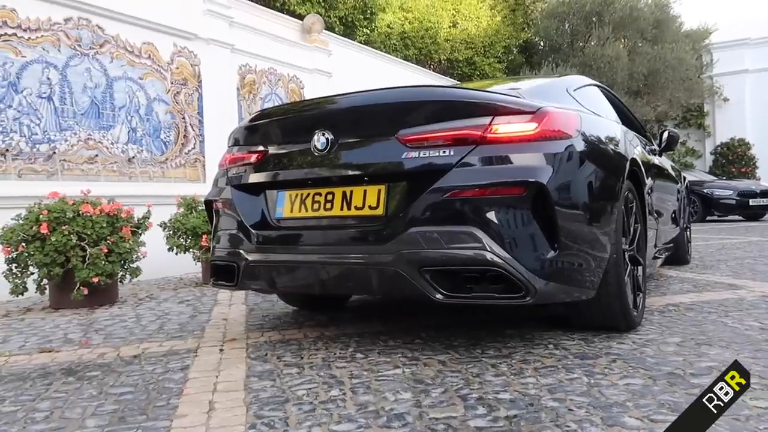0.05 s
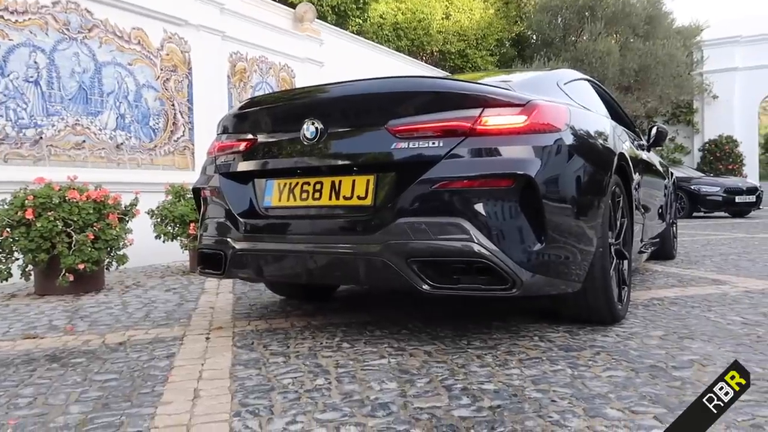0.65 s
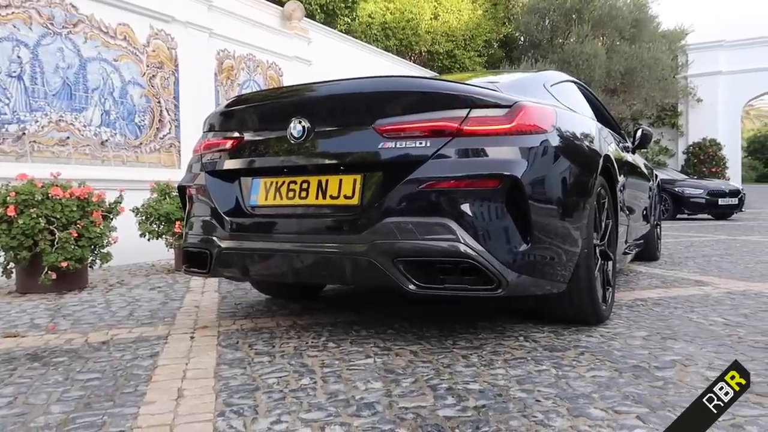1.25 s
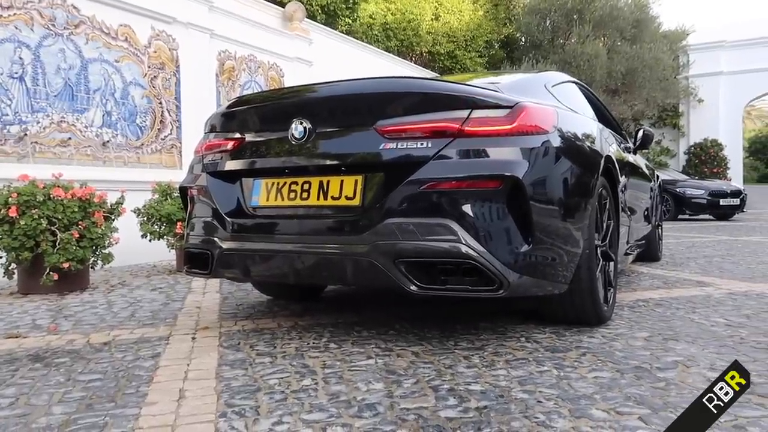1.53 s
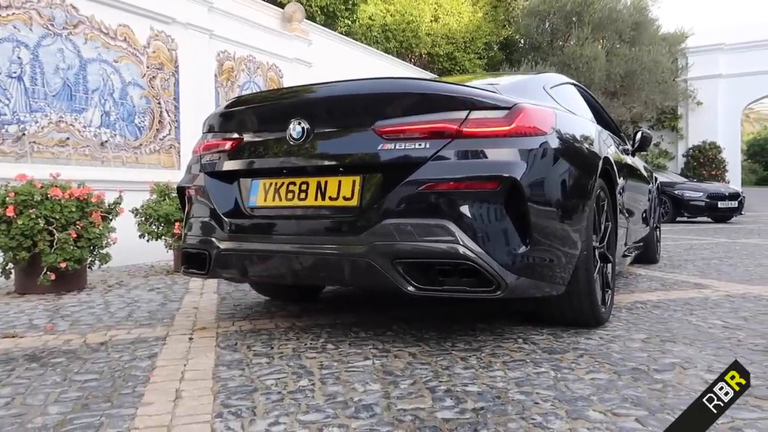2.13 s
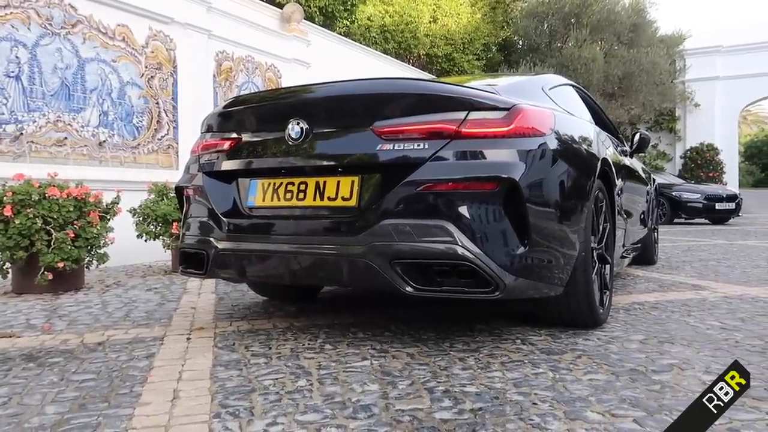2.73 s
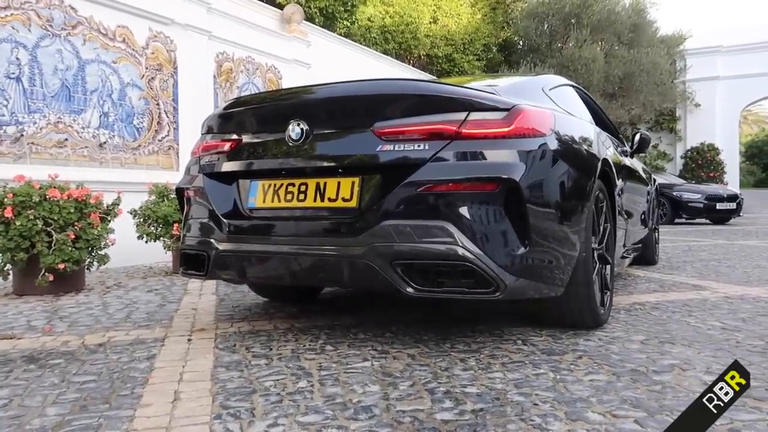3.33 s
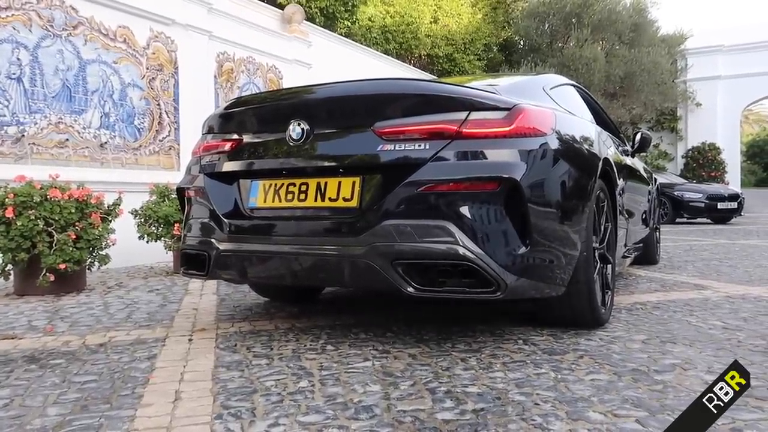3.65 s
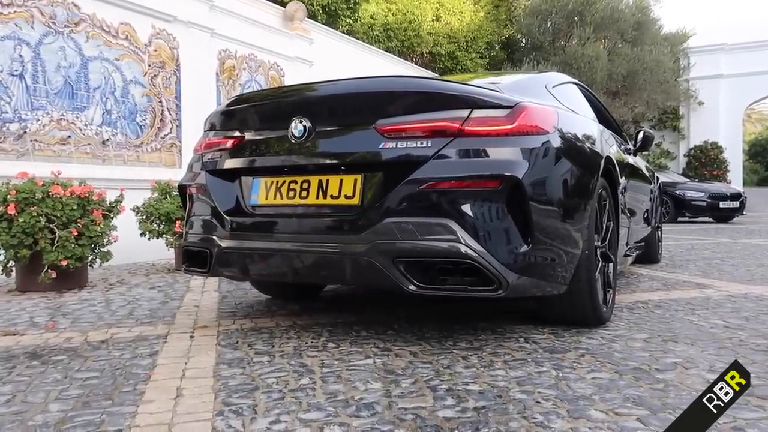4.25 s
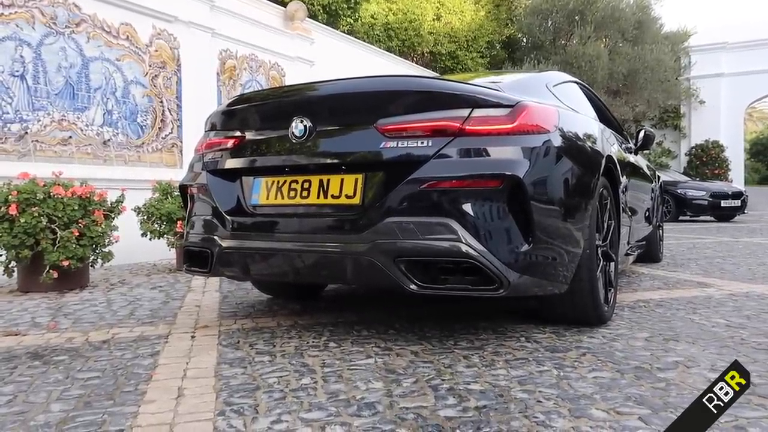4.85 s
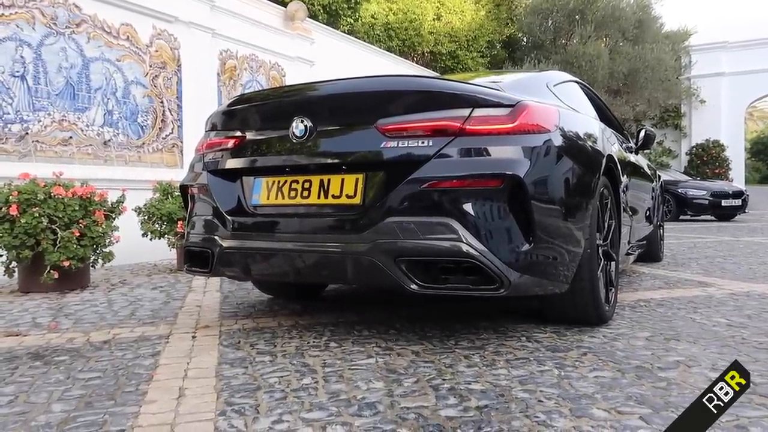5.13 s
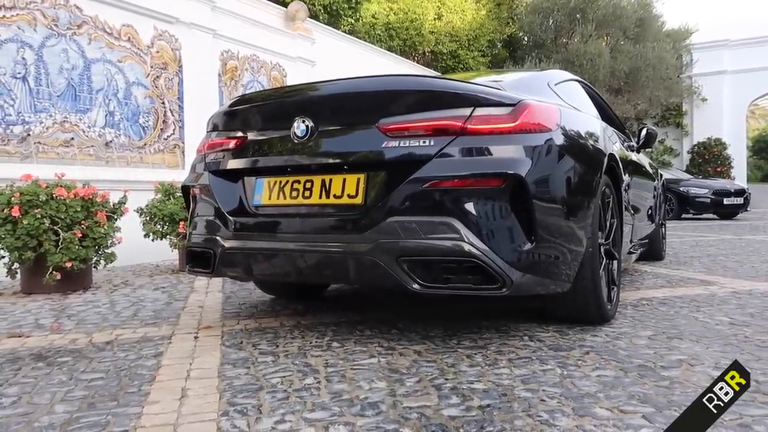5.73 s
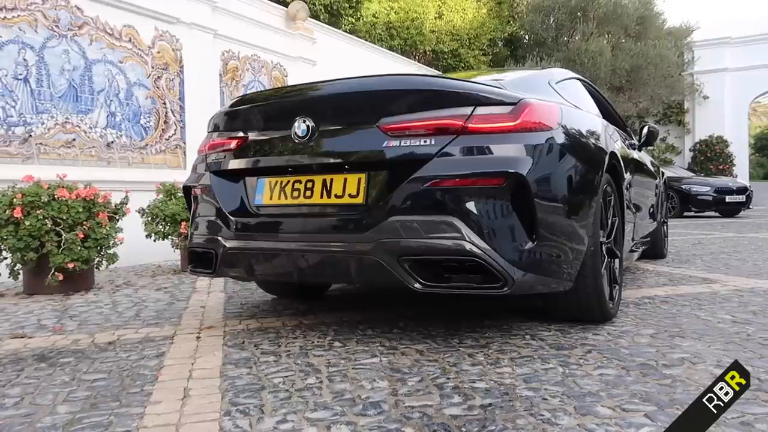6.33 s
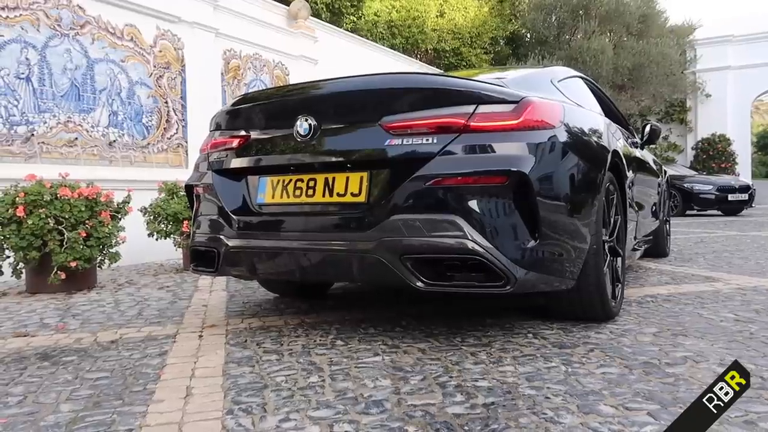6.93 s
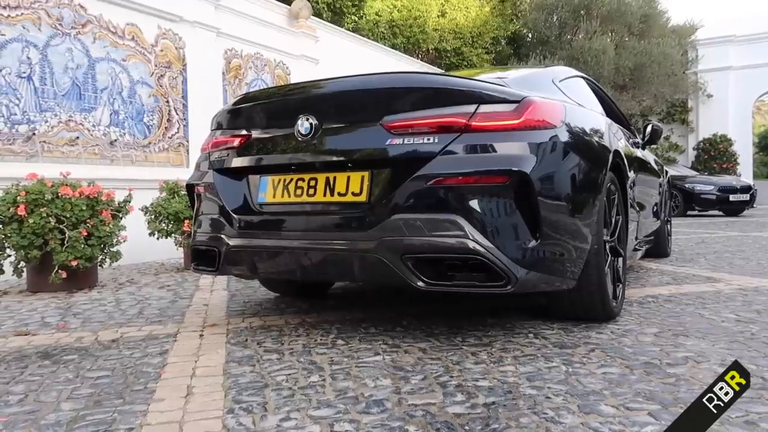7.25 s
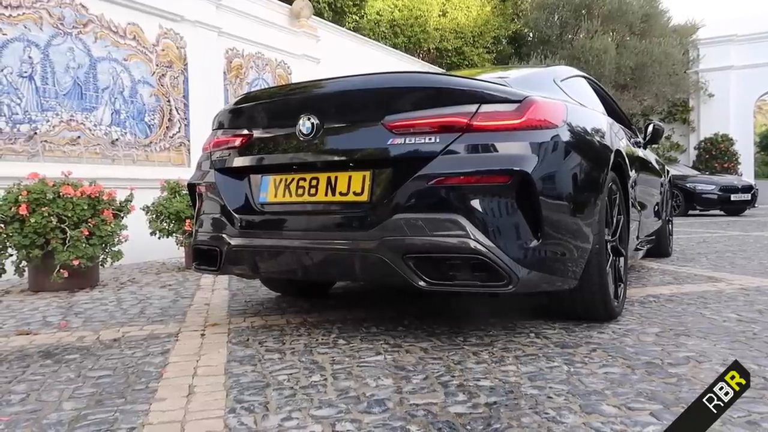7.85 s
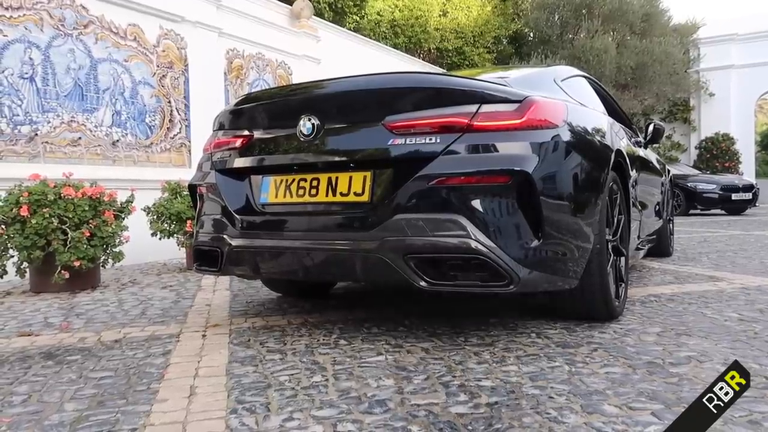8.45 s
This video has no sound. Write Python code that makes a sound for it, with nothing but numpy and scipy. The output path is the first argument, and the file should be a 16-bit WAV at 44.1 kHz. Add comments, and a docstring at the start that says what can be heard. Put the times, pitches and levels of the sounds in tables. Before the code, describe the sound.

A V8 petrol car starts with a flare, idles briefly, then revs in bursts, its exhaust popping and burbling in between.

```python
"""A walled courtyard, a few metres behind the tailpipes of a V8 petrol car.
Each press of the throttle swings the engine's speed up, and drag brings it back towards idle.
Two banks of cylinders fire unevenly and boom through the exhaust, and gas rasps with each firing.
With the throttle shut, unburnt fuel pops and burbles. The steel silencer knocks now and then,
the walls add a short echo, and a soft hiss lies behind it all."""
import sys
import numpy as np
from scipy import signal
from scipy.fft import rfft, irfft, next_fast_len
from scipy.io import wavfile
from scipy.ndimage import uniform_filter1d

SR = 44100
rng = np.random.default_rng(int(sys.argv[2]) if len(sys.argv) > 2 else 0)


def unload_audio(sound):
    """Save the sound as a 16-bit wav file, at the path given as the first command line argument."""
    columns = np.transpose(np.atleast_2d(sound))
    # keep every value between -1 and 1, then stretch to whole-number steps
    steps = np.round(np.clip(columns, -1, 1) * 32767)
    wavfile.write(sys.argv[1], SR, steps.astype(np.int16))


N = 374409
TIME = np.arange(N) / SR
FFT_SIZE = next_fast_len(N + SR, real=True)
FREQS = np.maximum(np.fft.rfftfreq(FFT_SIZE, 1 / SR), 1)


def undb(db):
    """Turn decibels into a number to multiply by."""
    return 10 ** (np.asarray(db) / 20)


def read_table(table, at):
    """Look up `at` in a table's first column and read the others, with straight lines between rows."""
    keys, *columns = np.transpose(table)
    return np.array([np.interp(at, keys, column) for column in columns])


def response(colour, resonances=()):
    """Build a filter from a tone colour (Hz, dB) and resonances (Hz, width in Hz, dB)."""
    hz, db = np.transpose(colour)
    gain_db = np.interp(np.log(FREQS), np.log(hz), db)
    for centre, width, height in resonances:
        gain_db = gain_db + height * .5 ** ((2 * (FREQS - centre) / width) ** 2)
    # make the filter ring only after a blow, never before it
    cepstrum = irfft(gain_db * np.log(10) / 20, FFT_SIZE)
    cepstrum[1:FFT_SIZE // 2] *= 2
    cepstrum[FFT_SIZE // 2 + 1:] = 0
    return np.exp(rfft(cepstrum))


def through(x, gain):
    """Pass a sound through a filter, given as one gain for each frequency."""
    return irfft(rfft(x, FFT_SIZE) * gain, FFT_SIZE)[..., :N]


def band(x, lo_hz, hi_hz, order=3):
    """Keep the sound between two frequencies."""
    return signal.sosfilt(signal.butter(order, [lo_hz, hi_hz], "band", fs=SR, output="sos"), x)


def noise(colour, resonances=()):
    """Noise with a given tone colour and an average (rms) level of 1."""
    x = through(rng.standard_normal(N), response(colour, resonances))
    return x / np.std(x)


def smooth(x, span_s):
    """Blur a signal by taking a sliding average twice."""
    size = int(span_s * SR)
    return uniform_filter1d(uniform_filter1d(x, size), size)


def steady(x, span_s):
    """Hold the average level near 1, keeping throbs that are faster than the span."""
    return x / np.sqrt(np.abs(smooth(x ** 2, span_s)) + 1e-18)


def wander(count):
    """Random values joined by straight lines over the whole scene."""
    return np.interp(TIME, np.linspace(0, TIME[-1], count), rng.standard_normal(count))


def envelope(start_s, hold_s, attack_s, release_s):
    """Rise in a straight line, hold until hold_s after the start, then die away."""
    age = TIME - start_s
    return np.clip(age / attack_s, 0, 1) * np.exp(-np.maximum(age - hold_s, 0) / release_s)


def impulses(times, sizes):
    """Sharp kicks at the given times, each shared between two neighbouring samples."""
    place = np.clip(times * SR, 0, N - 2)
    i = place.astype(int)
    return np.bincount(i, sizes * (1 - place + i), N) + np.bincount(i + 1, sizes * (place - i), N)


def die_away(kicks, decay_s):
    """Give each kick a fading tail."""
    return signal.lfilter([1], [1, -np.exp(-1 / (decay_s * SR))], kicks)


def puffs(kicks, decay_s):
    """A dying burst of noise after each kick, like swirling gas."""
    return die_away(kicks, decay_s) * rng.standard_normal(N)


# How loud the background hiss is. Each row: time in seconds, level in dB.
HISS_LEVELS = [(0, -26), (.1, -45.5), (.25, -46.5), (1.2, -45.5), (2.24, -39.5), (2.26, -33), (2.3, -38),
               (2.55, -36), (2.8, -47.5), (4.3, -42.5), (4.45, -46.5), (7.55, -47), (7.68, -40.5),
               (7.78, -47.5), (8.49, -53)]
# Its tone colour in the centre and at the sides. Each row: frequency in Hz, level in dB.
HISS_CENTRE_COLOUR = [(30, 2), (200, -0.5), (450, 2.5), (620, -0.5), (760, 1.5), (1000, -3.5), (2000, -7.5),
                      (3000, -13.5), (4000, -17), (6000, -27), (9000, -33), (13000, -55)]
HISS_SIDES_COLOUR = [(100, -49.5), (200, -19.5), (300, 2), (1000, 4), (3000, 3.5), (4000, 0), (6000, -4),
                     (9000, -6), (13000, -12.5)]


def hiss(sides_db=-13.5, flutter_db=1.85):
    """A soft hiss that swells now and then: the lows flutter in the centre, the treble is wide."""
    level_db, = read_table(HISS_LEVELS, TIME)
    flutter = undb(flutter_db * wander(count=120))
    centre = noise(HISS_CENTRE_COLOUR) * flutter
    sides = noise(HISS_SIDES_COLOUR) * undb(sides_db)
    return undb(level_db) * np.array([centre + sides, centre - sides])


def courtyard(x, centre_db=-16, sides_db=-17, gap_s=.014, echo_s=.23):
    """Walls and cobbles return a short, blurred echo; its upper part differs between the ears."""
    t = TIME[:SR]
    tails = rng.standard_normal((2, SR)) * undb(-60 * t / echo_s) * (t > gap_s)
    tails /= np.sqrt(np.sum(tails ** 2, axis=1, keepdims=True))
    centre, sides = through(x, rfft(tails, FFT_SIZE))
    centre_colour = [(100, -9), (500, 11), (3000, 3.5), (10000, -1.5)]
    sides_colour = [(130, -27), (300, -10), (700, -3), (2000, 2.5), (6000, -4)]
    centre = undb(centre_db) * through(centre, response(centre_colour))
    sides = undb(sides_db) * through(sides, response(sides_colour))
    return np.array([centre + sides, centre - sides])


def whine(level_db=-43, decay_s=.062):
    """A thin metallic whine dies away at the very start, as the engine catches."""
    colour = [(1000, -52.5), (3500, -10.5), (6500, -24), (13000, -31.5)]
    ring = noise(colour, resonances=[(4900, 530, 8.9), (6400, 330, 3.9)])
    return ring * undb(level_db) * np.exp(-TIME / decay_s)


# Light ticks of metal. Each row: start in seconds, level in dB.
METAL_TICKS = [(2.592, -48.5), (4.585, -58), (7.992, -52.5), (8.068, -51.5)]


def ticks(soften_s=.003):
    """Metal ticks faintly: tiny bursts of high noise with softened edges."""
    times, level_db = np.transpose(METAL_TICKS)
    kicks = uniform_filter1d(impulses(times, undb(level_db)), int(soften_s * SR))
    return band(puffs(kicks, decay_s=.01), 5500, 11000, order=4)


# Hollow knocks in the silencer. Each row: start in seconds, level in dB, ringing pitch in Hz.
SILENCER_KNOCKS = [(.184, -39, 1800), (.926, -45, 1800), (2.263, -30.5, 2270), (2.923, -25, 1650),
                   (2.936, -29, 1750), (3.173, -27, 1670), (3.303, -29.5, 1550), (3.351, -27, 1630),
                   (3.503, -37, 2100), (3.564, -27, 1800), (4.2924, -18, 1930), (4.3018, -15, 1590),
                   (4.308, -33, 2880), (4.308, -26, 1550), (5.121, -28.5, 1516), (5.159, -33.5, 1600),
                   (5.202, -33.5, 1670), (5.56, -37, 1823), (5.571, -26, 1680), (5.939, -27, 1610),
                   (6.17, -31.5, 1890), (6.65, -35, 1500), (6.887, -35, 1680), (6.908, -41, 2000),
                   (7.602, -33, 1511), (7.707, -33.5, 1600), (7.991, -36.5, 1690), (8.062, -30.5, 1991),
                   (8.169, -33, 1800), (8.231, -28.5, 1800)]


def knocks(decay_s=.004, spread=.12):
    """Small bursts inside the silencer ring its steel shell briefly."""
    out = np.zeros(N)
    for start_s, level_db, hz in SILENCER_KNOCKS:
        burst = puffs(impulses(np.array([start_s]), np.ones(1)), decay_s)
        ring = band(burst, hz * (1 - spread), hz * (1 + spread), order=2)
        out += undb(level_db) * ring * np.sqrt(decay_s * SR / 2 / np.sum(ring ** 2))
    return out


# The tone colour of the exhaust. Each row: frequency in Hz, level in dB.
PIPE_COLOUR = [(15, -48.5), (33, -11.5), (60, -18), (90, -2.5), (130, 4), (165, 0), (210, -13.5),
               (400, -20), (550, -41.5), (1200, -43.5), (2000, -60), (3000, -62), (6000, -89), (9500, -90),
               (14000, -99)]
# Its resonances and dips. Each row: frequency in Hz, width in Hz, boost or cut in dB.
PIPE_RESONANCES = [(185, 86, 1.5), (182.9, 15, -2), (252.3, 51, 3.5), (304.3, 25, -4), (364, 30, 1.5),
                   (474.6, 30, 8), (595, 32, 8.5), (742, 86, 9.5), (1014, 35, 2.5), (1130, 17, 6.5),
                   (1560, 200, 5), (1733, 150, 9.5), (2167, 340, 11)]


def exhaust_pipe():
    """The exhaust acts as a filter: it lets the lows out and rings at its own pitches."""
    return response(PIPE_COLOUR, PIPE_RESONANCES)


# The tone colour of a shock wave. Each row: frequency in Hz, level in dB.
SHOCK_COLOUR = [(100, -17.5), (220, -7), (350, 7), (480, 5), (560, -10.5), (800, -11), (1100, -11),
                (1500, -22.5), (2300, -27), (3800, -37), (6000, -54.5), (14000, -85.5)]


def shocks(times, bark_db, peak_db=-5, full_at_db=-10, db_per_db=1.86):
    """A hard pop steepens into a shock wave that strikes the pipe's resonances: a chesty bang."""
    ring = response(SHOCK_COLOUR, PIPE_RESONANCES)
    sizes = undb(peak_db + db_per_db * np.minimum(bark_db - full_at_db, 0))
    return -through(impulses(times, sizes), ring) / np.abs(irfft(ring)).max()


# Loud pops, from fuel catching fire in the exhaust or a cylinder firing hard.
# Each row: start in seconds, then the levels of the thump, the bark and the crack in dB.
FUEL_POPS = [(.059, -2, -18, -36.5), (.12, -4, -17.5, -22.5), (0.509, -10, -35, -36),
             (0.641, -10.5, -35, -26.5), (0.719, -11.5, -32.5, -47.5), (0.788, -2.5, -21.5, -35.5),
             (0.85, -5, -23, -34.5), (0.884, -8, -30.5, -27), (1.05, -10, -36, -34), (1.077, -7, -27, -44),
             (1.149, -4, -22.5, -27.5), (1.208, -15.5, -25.5, -57), (1.24, -17, -41, -50),
             (1.311, -20, -37.5, -50), (1.866, -25, -42.5, -50), (2.071, -22.5, -42, -36),
             (2.462, -22.5, -27.5, -42), (2.517, -18, -41.5, -40.5), (2.536, -15.5, -27.5, -45),
             (2.561, -9, -31.5, -33.5), (2.578, -11, -25.5, -41), (2.592, -16.5, -20.5, -33.5),
             (2.606, -9.5, -37, -29), (2.821, -8.5, -18, -36), (2.934, -8.5, -17, -23),
             (3.15, -3.5, -26, -29.5), (3.172, -13, -19.5, -23), (3.297, -9, -23, -23),
             (3.349, -4, -26, -24), (3.427, -11.5, -21.5, -27), (3.5019, -6.5, -15.5, -28),
             (3.523, -3, -20.5, -24), (3.534, -6.5, -18.5, -25.5), (3.541, -11, -22, -22),
             (3.5635, -12, -17.5, -14), (3.573, -17, -18.5, -19), (4.2932, -12, -13, -7),
             (4.3014, -6.5, -20, -16.5), (4.3078, -11.5, -17.5, -14), (4.368, -14.5, -20, -28),
             (4.734, -10.5, -23.5, -31.5), (4.864, -15, -24.5, -26), (4.957, -12, -25.5, -30.5),
             (5.084, -5, -31.5, -41), (5.099, -3.5, -29, -51), (5.193, -9.5, -20, -30),
             (5.246, -4, -21.5, -26), (5.266, -3.5, -26.5, -33), (5.907, -12, -21.5, -14.5),
             (5.915, -4, -18.5, -25), (5.933, -10, -18, -34.5), (5.968, -5.5, -25.5, -29),
             (6.162, -9, -22, -23.5), (6.176, -16.5, -24.5, -27), (6.264, -11.5, -26.5, -29.5),
             (6.298, -16.5, -23, -32.5), (6.36, -9.5, -29, -35), (6.379, -5.5, -20.5, -33),
             (6.447, -8, -26, -38), (6.501, -5.5, -19.5, -40), (6.649, -6.5, -27.5, -31.5),
             (6.687, -3.5, -36.5, -41), (6.718, -7, -25, -30), (6.7234, -4, -16, -19.5),
             (6.745, -21.5, -25, -32.5), (6.843, -4.5, -30.5, -41), (6.961, -6, -34, -31.5),
             (6.992, -16.5, -34, -57), (7.566, -15, -28.5, -40), (7.601, -3, -24.5, -28.5),
             (7.991, -6.5, -25.5, -46), (8.036, -11.5, -36.5, -59), (8.062, -11.5, -25, -37),
             (8.167, -4.5, -24, -33)]
# The tone colours of those three parts. Each row: frequency in Hz, level in dB.
THUMP_COLOUR = [(50, -2.5), (90, -6.5), (140, -1), (400, 2), (800, 2), (1400, -6), (3000, -16),
                (9000, -20.5)]
BARK_COLOUR = [(120, -20.5), (270, 5), (420, 4.5), (560, -17.5), (800, -12), (1200, -19.5), (1700, -20.5),
               (2300, -31.5), (2800, -41), (6000, -51.5), (14000, -68)]
CRACK_COLOUR = [(100, -11), (450, 14.5), (850, 5.5), (1300, -0.5), (2200, -16.5), (2900, -17),
                (6000, -41.5), (14000, -59)]


def pops(pipe, spray_db=-17, round_trip_s=.0084, return_db=-12):
    """Each pop thumps the gas in the pipe, barks as the flame runs out, and cracks at the tip."""
    times, thump_db, bark_db, crack_db = np.transpose(FUEL_POPS)
    # a pressure wave runs down the pipe and back, weaker on every trip
    echoes = 1 / (1 - undb(return_db) * np.exp(-2j * np.pi * FREQS * round_trip_s))
    thump = -through(impulses(times, undb(thump_db)), pipe * response(THUMP_COLOUR))
    thump /= np.abs(irfft(pipe)).max()
    flame, tip = response(BARK_COLOUR), response(CRACK_COLOUR)
    bark = through(puffs(impulses(times, undb(bark_db)), decay_s=.008), flame * echoes)
    bark /= np.sqrt(np.mean(np.abs(flame) ** 2))
    kicks = impulses(times, undb(crack_db))
    spray = undb(spray_db) * puffs(kicks, decay_s=.0012)
    crack = through(spray - kicks, tip * echoes) / np.abs(irfft(tip)).max()
    return thump + bark + crack + shocks(times, bark_db)


def misfires(dip_db=-3, lead_s=.0069, half_width_s=.004):
    """Fuel fails to burn just before each pop, so the engine's level dips and the pop stands clear."""
    dip = np.zeros(N)
    for start_s, *_ in FUEL_POPS:
        dip = np.maximum(dip, 1 - np.abs(TIME - start_s + lead_s) / half_width_s)
    return undb(dip_db * dip)


def sputter(cycle_hz, decay_s=.011, depth=1.2):
    """Late fuel burns in soft spurts, about two per engine cycle; gives a gain that hovers near 1."""
    half_cycles = 2 * np.cumsum(cycle_hz) / SR
    k = np.arange(1, int(half_cycles[-1]))
    times = np.interp(k + rng.random(len(k)) / 2, half_cycles, TIME)
    spurts = die_away(impulses(times, np.ones(len(k))), decay_s)
    return steady(1 + depth * smooth(spurts, .003), .11)


# Runs of late-burning fuel. Each row: start and length in seconds, then boom, bark and rasp in dB.
BURBLE_RUNS = [(0, 0.03, -16.5, -22.5, -44), (0.488, 0.25, -26, -39, -54), (0.842, 0.09, -23.5, -30.5, -45),
               (1.185, 0.16, -23.5, -54, -61), (3.143, 0.045, -18.5, -20.5, -34.5),
               (3.297, 0.052, -32.5, -26, -36), (3.413, 0.058, -24, -25, -44),
               (3.525, 0.0069, -16.5, -13.5, -26), (3.552, 0.11, -24, -54, -46),
               (4.191, 0.11, -14.5, -31, -51), (4.462, 0.056, -41.5, -38, -45.5),
               (4.928, 0.17, -32, -32.5, -46.5), (4.568, 0.18, -40, -30, -47.5),
               (4.716, 0.071, -26.5, -23.5, -37.5), (4.856, 0.034, -21, -29, -37),
               (5.084, 0.053, -17.5, -20, -41), (5.199, 0.078, -17.5, -24, -44.5),
               (5.792, 0.13, -17, -35.5, -47.5), (5.898, 0.06, -19.5, -23, -34),
               (5.967, 0.07, -18.5, -26.5, -37.5), (6.067, 0.056, -18, -27, -38),
               (6.14, 0.034, -11, -20, -36), (6.207, 0.19, -15.5, -26, -39.5),
               (6.427, 0.053, -30.5, -31, -41), (6.488, 0.12, -21.5, -33.5, -42.5),
               (6.643, 0.1, -36, -26, -46.5), (6.81, 0.2, -30.5, -31.5, -51),
               (7.997, 0.084, -28, -27.5, -56)]


def burbles(cycle_hz, attack_s=.011, release_s=.025):
    """The power that late-burning fuel adds to the engine's boom, bark and rasp."""
    power = np.zeros((3, N))
    for start_s, length_s, *levels_db in BURBLE_RUNS:
        power += np.outer(undb(levels_db), envelope(start_s, length_s, attack_s, release_s)) ** 2
    power[1:] *= sputter(cycle_hz) ** 2  # only the bark and rasp sputter
    return power


# Presses of the throttle. Each row: start, time held, time to open and time to top speed, all in
# seconds, top speed in cycles per second, then three boosts in dB: for boom and throb, for bark
# and rasp, and for the coasting sound until the next press.
THROTTLE_PRESSES = [(.02, .19, 0.068, .3, 28.87, 1, 1, -2.5), (2.505, 0.25, 0.17, .5, 22.29, 1.5, 1.5, 3),
                    (2.75, 0.22, 0.031, 0.21, 29.32, -2.5, 3.5, 1),
                    (3.675, .28, 0.057, .41, 37.5, -2, 3.5, 1.5),
                    (5.315, 0.28, 0.054, .395, 37.48, -1, 3, 0.5),
                    (7.565, 0.15, 0.057, .11, 26.29, 2.5, 0.5, -3),
                    (8.129, 0.12, 0.028, 0.088, 26.16, 0.5, 1, -4.5)]
# Engine speeds in cycles per second. In one cycle, every cylinder fires once.
START_HZ, IDLE_HZ, SAG_BELOW_HZ = 18, 6.1, 17.5


def engine_speed(rise_curve=1.15, linger_s=.13, drag_per_s=.71, sag_hz_per_s=12):
    """Each press swings the speed up; it lingers, coasts down under drag, then sags towards idle."""
    hz = np.full(N, float(START_HZ))
    for start_s, _, _, rise_s, top_hz, *_ in THROTTLE_PRESSES:
        from_hz = np.interp(start_s, TIME, hz)
        progress = np.clip((TIME - start_s) / rise_s, 0, 1)
        rise = from_hz + (top_hz - from_hz) * np.sin(np.pi / 2 * progress) ** rise_curve
        past_top_s = np.maximum(TIME - start_s - rise_s, 0)
        coast = top_hz * np.exp(-drag_per_s * (np.hypot(past_top_s, linger_s) - linger_s))
        sag = sag_hz_per_s * np.cumsum(coast < SAG_BELOW_HZ) / SR
        fall = np.maximum(coast - sag, IDLE_HZ)
        hz = np.where(TIME < start_s, hz, np.where(past_top_s > 0, fall, rise))
    return hz


# The exhaust with the throttle shut, and with it open. Each row: speed in cycles per second,
# levels of boom, bark, rasp and throb in dB, then how uneven the firing is, from 0 to 1.
THROTTLE_SHUT = [(6.05, -30, -47.5, -59.5, -40.5, 0.6), (14.6, -26, -36.5, -65, -44, .9),
                 (21.5, -24, -40, -51, -40.5, 0.5), (28.3, -19.5, -32, -44, -46.5, 0.6),
                 (33.3, -30.5, -35.5, -48, -52, 0.6), (35.7, -23.5, -30, -34.5, -48, 0.3),
                 (36.7, -23.5, -27, -37, -45, .08)]
THROTTLE_OPEN = [(8, -2, -37.5, -42.5, -8, 0.35), (12.8, -12, -26.5, -42, -37.5, 0.46),
                 (20.6, -14.5, -23, -39.5, -41, 0.25), (27.6, -10.5, -23, -39.5, -51, 0.25),
                 (32, -14, -24.5, -35, -54, 0.15)]


def combustion(cycle_hz, release_s=.033):
    """Speed and throttle set how hard and how evenly fuel burns; gives gains, unevenness, throttle."""
    shut, wide = read_table(THROTTLE_SHUT, cycle_hz), read_table(THROTTLE_OPEN, cycle_hz)
    starts, *_, coast_db = np.transpose(THROTTLE_PRESSES)
    latest_press = np.searchsorted(starts[1:], TIME)
    power = undb(shut[:-1] + coast_db[latest_press]) ** 2
    open_gains, throttle = undb(wide[:-1]), 0
    for start_s, held_s, open_s, _, _, low_db, high_db, _ in THROTTLE_PRESSES:
        press = envelope(start_s, held_s, open_s, release_s)
        power += (open_gains * np.outer(undb([low_db, high_db, high_db, low_db]), press)) ** 2
        throttle = np.maximum(throttle, press)
    power[:-1] += burbles(cycle_hz)
    uneven = np.clip(shut[-1] + throttle * (wide[-1] - shut[-1]), 0, 1)
    return np.sqrt(power), uneven, throttle


# The tone colour of the silencer's steel shell. Each row: frequency in Hz, level in dB.
SHELL_COLOUR = [(500, -18.5), (1050, -13.5), (1350, 12), (2150, -8), (2800, -10.5), (5000, -28),
                (9000, -65.5), (14000, -64)]
# Its resonances. Each row: frequency in Hz, width in Hz, boost in dB.
SHELL_RESONANCES = [(1340, 220, 1.8), (1830, 55, 2.9)]


def silencer_shell(blows, gas):
    """Firings and rushing gas ring the silencer's steel shell."""
    return steady(through(.87 * blows + gas, response(SHELL_COLOUR, SHELL_RESONANCES)), .079)


# Tones that ring cleanly when the firing is even. Each row: pitch as a multiple of the engine's
# speed, level in dB with the throttle shut, level in dB with it open.
DRONE_TONES = [(3, -1, -5.5), (4, -8, -11), (5, 4, 2.5), (8, -3.5, 3), (11, -4, -5), (13, 11, 7),
               (16, 12, 6), (20, -0.5, -1.5), (27, 4, -2.5), (31, 1, -4.5)]


def drone(pipe, cycle_hz, uneven, throttle, waver=.4, falter_db=9):
    """The engine's note: tones swell as they cross a pipe resonance, and falter off the throttle."""
    cycles = np.cumsum(cycle_hz) / SR
    out = 0
    for multiple, shut_db, open_db in DRONE_TONES:
        phase_drift = waver * np.sqrt(uneven) * wander(count=260)
        flutter_db = 2 * wander(count=500)
        level_db = shut_db + throttle * (open_db - shut_db)
        level_db += falter_db * uneven * (1 - throttle) * wander(count=150)
        gain = undb(level_db + flutter_db) * np.interp(multiple * cycle_hz, FREQS, np.abs(pipe))
        out = out + gain * np.sin(2 * np.pi * (multiple * cycles + rng.random()) + phase_drift)
    return out * cycle_hz / SR


# The cylinders in the order they fire. Each row: bank (0 is near, 1 is far), strength in dB.
FIRING_ORDER = [(0, -2), (1, -0.5), (0, -1.3), (0, 1.7), (1, 0), (0, 1), (1, -0.5), (1, -3)]


def firings(cycle_hz, uneven, scatter_db=3.5, jitter_s=.0009, far_bank_s=.0016):
    """Eight blows a cycle, stumbling near idle; the far bank arrives late, giving the V8 its burble."""
    count = len(FIRING_ORDER)
    fired = np.cumsum(cycle_hz) * count / SR
    k = np.arange(1, int(fired[-1]))
    times = np.interp(k, fired, TIME)
    bank, strength_db = np.array(FIRING_ORDER)[k % count].T
    size_luck, time_luck = rng.standard_normal((len(k), 2)).T * np.interp(times, TIME, uneven)
    stumble = np.maximum(SAG_BELOW_HZ / np.interp(times, TIME, cycle_hz), 1) ** 1.5
    sizes = undb(strength_db + scatter_db * np.tanh(size_luck))
    return impulses(times + far_bank_s * bank + jitter_s * stumble * time_luck, sizes)


def silencer_throb(blows, gas, cold_db=11.5, warm_db=-3.5, warm_up_s=2.1):
    """The silencer throbs very low, hardest at the start while it is still cold."""
    level_db = warm_db + (cold_db - warm_db) * np.exp(-TIME / warm_up_s)
    return steady(band(blows + 1.8 * gas, 28, 59, order=2), .071) * undb(level_db)


def engine(pipe, boom_top_hz=230, bark_top_hz=650, boom_db=-.13, bark_db=.05, rasp_db=.5,
           drone_db=22, shell_db=-5, spit_db=-56, lope_db=3):
    """Firings ring the exhaust: a deep boom, a bark above it, and gas rasping with each blow."""
    cycle_hz = engine_speed()
    (boom_gain, bark_gain, rasp_gain, throb_gain), uneven, throttle = combustion(cycle_hz)
    blows = firings(cycle_hz, uneven)
    gas = puffs(blows, decay_s=.003)
    gas *= np.std(blows) / np.std(gas)
    note = drone(pipe, cycle_hz, uneven, throttle) * undb(drone_db) * (1 - uneven) ** 2
    # an open throttle makes the note stand out; uneven burning adds gas noise
    boom = note * undb(10 * throttle) + through(blows + (.56 + .35 * uneven) * gas, pipe)
    boom = band(boom, 62, boom_top_hz)
    bark = note * undb(1.5 * throttle) + through(blows + (.99 + .84 * uneven) * gas, pipe)
    bark = band(bark, boom_top_hz, bark_top_hz, order=4)
    rasp = band(through(.063 * blows + gas, pipe), bark_top_hz, 15000, order=4)
    # with the throttle open, the shell rings and the pipe tips spit
    shell = silencer_shell(blows, gas) * throttle * rasp_gain * undb(shell_db)
    spit = steady(band(gas, 1500, 4200, order=2), .1) * np.sqrt(throttle) * undb(spit_db)
    # gas leaves on the crests of the boom, which chops up the higher sounds
    chop = steady(undb(3.5 * np.tanh(steady(boom, .035))), .035)
    # uneven burning makes the whole exhaust swell and dip
    lope = undb(lope_db * uneven * wander(count=220))
    return lope * (steady(boom, .028) * boom_gain * undb(boom_db)
                   + steady(bark, .039) * bark_gain * undb(bark_db)
                   + chop * (steady(rasp, .081) * rasp_gain * undb(rasp_db) + shell + spit)
                   + silencer_throb(blows, gas) * throb_gain)


def scene(fade_s=.004):
    """The car, its echo from the walls, and the hiss."""
    pipe = exhaust_pipe()
    car = engine(pipe) * misfires() + pops(pipe) + knocks() + ticks() + whine()
    fade_out = np.clip((TIME[-1] - TIME) / fade_s, 0, 1)
    return (car + courtyard(car) + hiss()) * fade_out


def record(dry, ceiling=.93, top_hz=14300):
    """Round off the tallest peaks and cut the highest treble."""
    rounded = dry / (1 + (dry / ceiling) ** 6) ** (1 / 6)
    return signal.sosfilt(signal.ellip(8, .2, 70, top_hz, fs=SR, output="sos"), rounded)


dry = scene()
out = record(dry)
unload_audio(out)
```